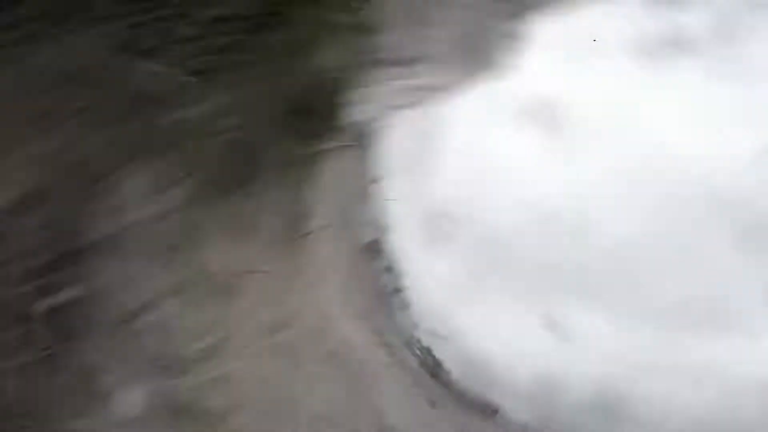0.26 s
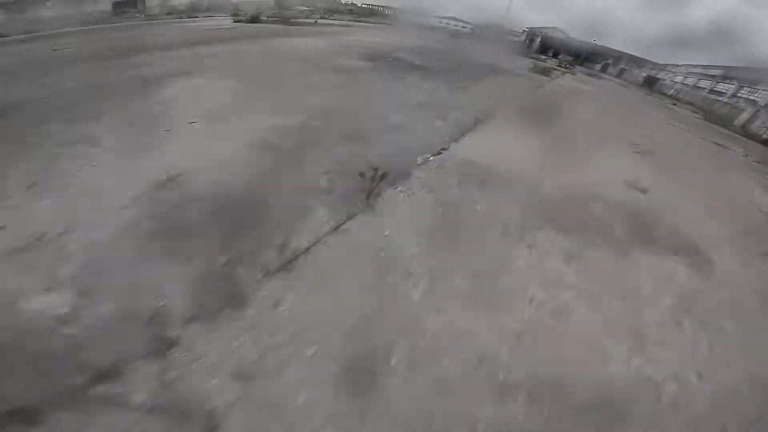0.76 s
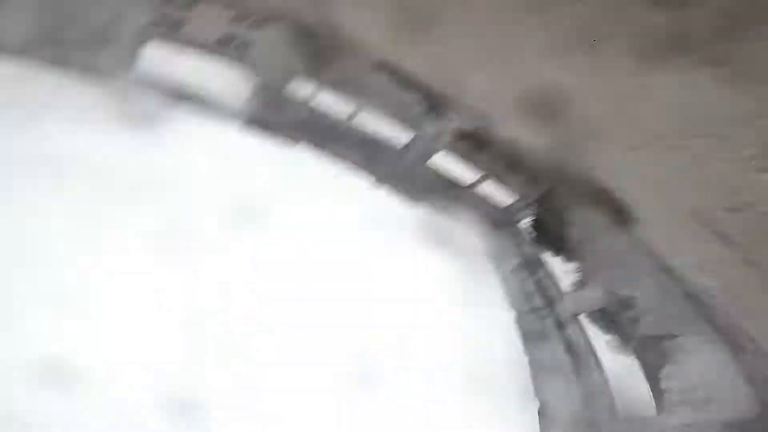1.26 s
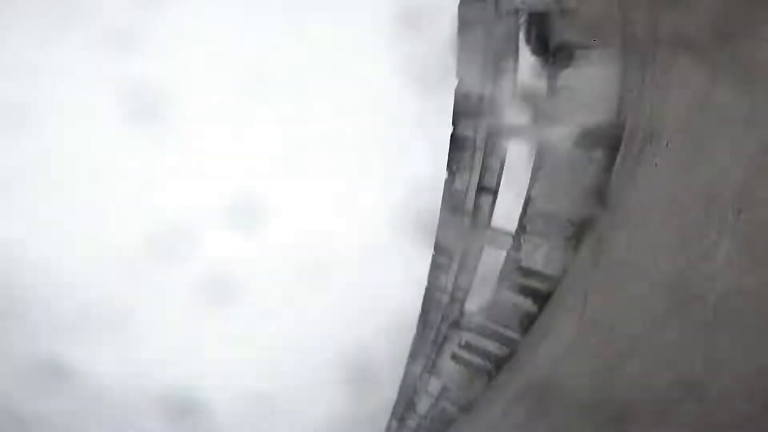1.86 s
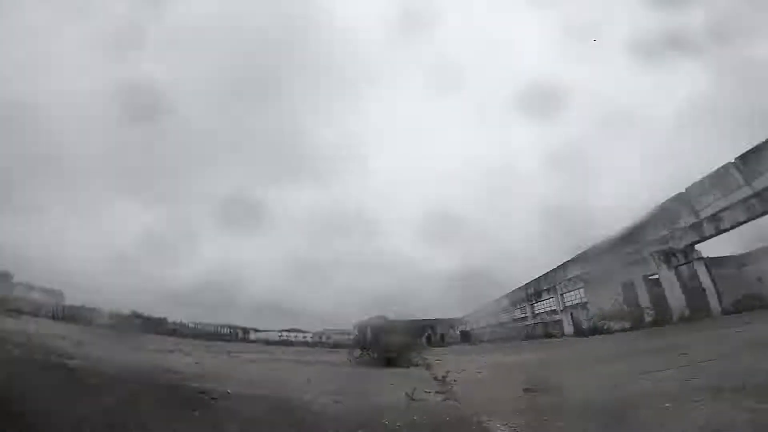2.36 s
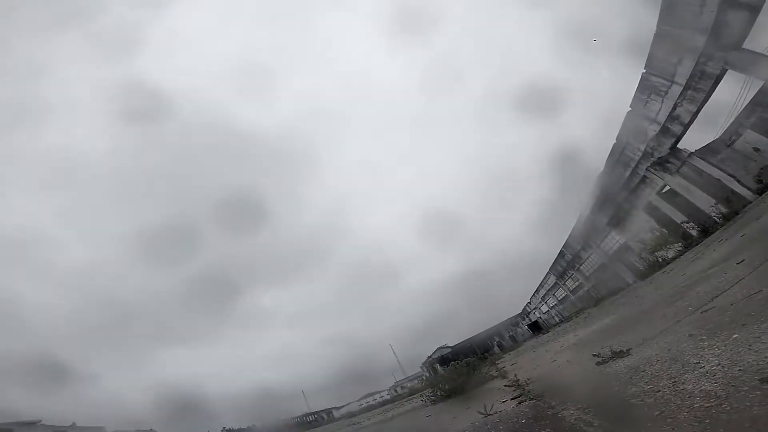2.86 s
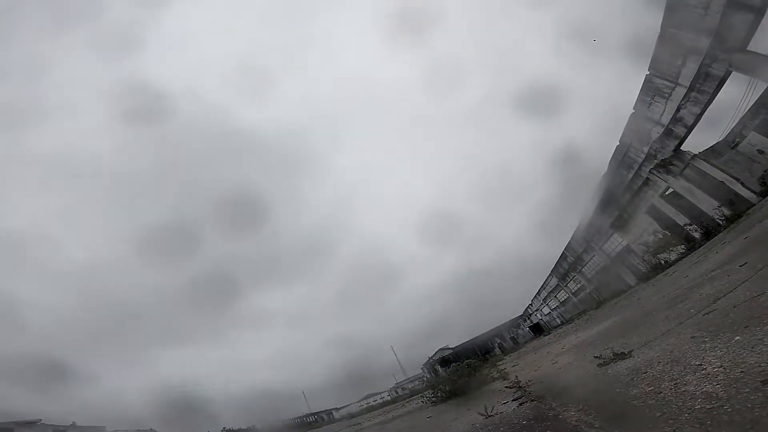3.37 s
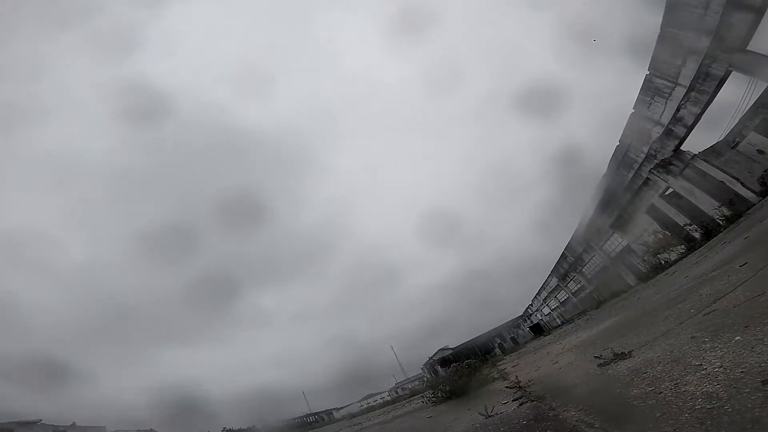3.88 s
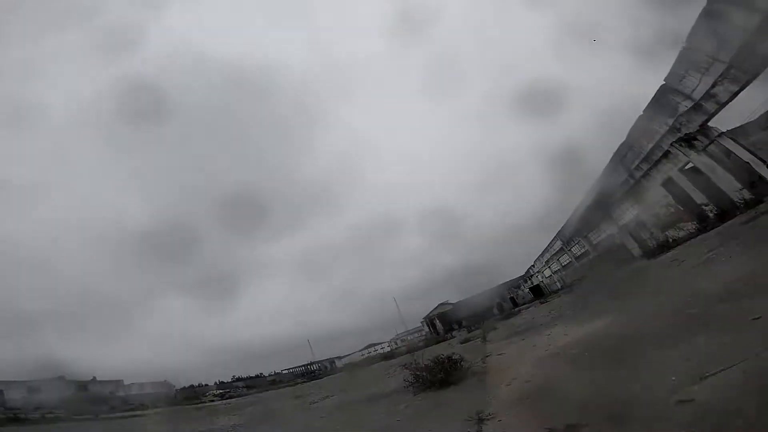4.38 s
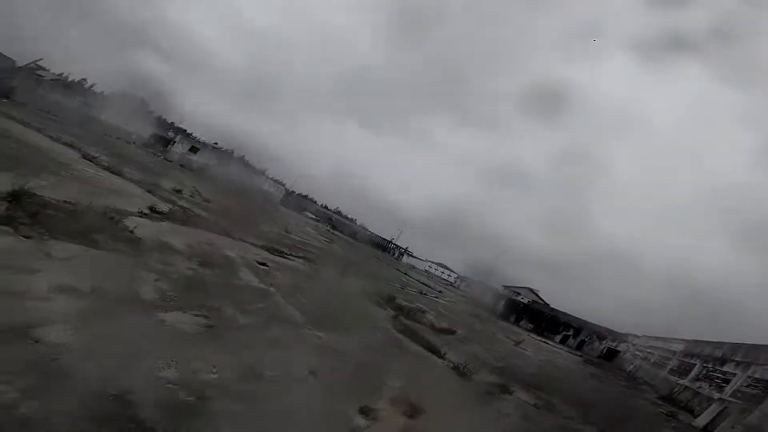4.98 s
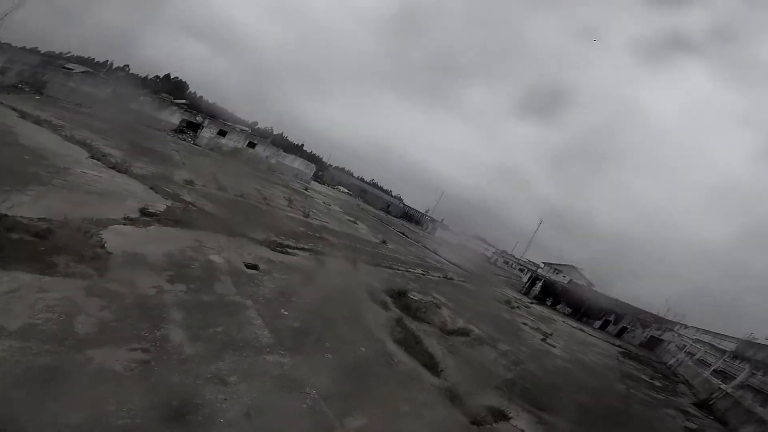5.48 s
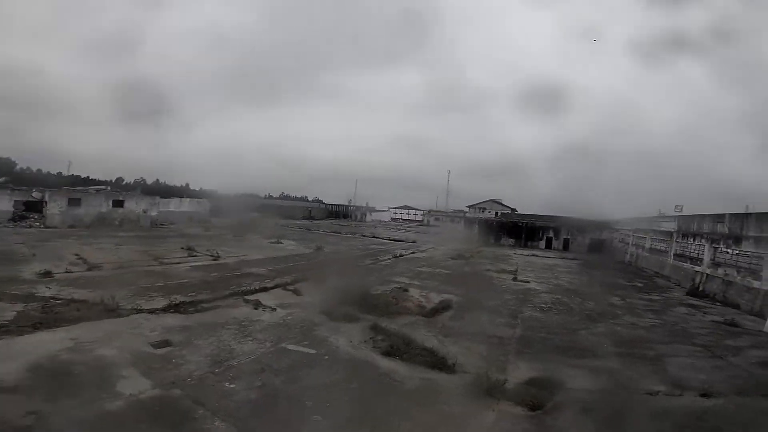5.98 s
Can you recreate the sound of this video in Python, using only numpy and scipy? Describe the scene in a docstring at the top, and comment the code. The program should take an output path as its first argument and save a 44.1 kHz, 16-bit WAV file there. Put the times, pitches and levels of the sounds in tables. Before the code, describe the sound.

A microphone on a small quadcopter's frame, in an open concrete yard. Rotors whine and surge unevenly amid hard knocks, then run down and stop. The frame tumbles on with clacks, thuds and gritty scrapes, settling into near silence. The motors restart with a low, rough buzz and ground chatter, rise sharply into a whine, lift off, then dip and surge again.

```python
"""A concrete yard, heard from a microphone on the frame of a small racing quadcopter that clips the ground.
Blade tones, shaft hum and torn air surge as it tumbles; drag slows the rotors and the ground stops them.
The frame knocks and scrapes to rest: bursts of grit noise for the contacts, dying sines for the thuds.
Four three-blade rotors restart at unequal speeds, churn the air against the ground, and lift it off."""
import sys
import numpy as np
from scipy import signal
from scipy.io import wavfile
from scipy.ndimage import uniform_filter1d

SR = 44100
rng = np.random.default_rng(int(sys.argv[2]) if len(sys.argv) > 2 else 0)


def master_out(mix):
    """Clip the mix to full scale and print it as 16-bit PCM to the path in sys.argv[1]."""
    frames = np.transpose(np.atleast_2d(mix))
    ceiling = np.clip(frames, -1, 1)
    pcm = np.round(ceiling * 32767).astype(np.int16)
    wavfile.write(sys.argv[1], SR, pcm)


N = 274953
T = np.arange(N) / SR

# Two rotors in the tumble. Each row: time in seconds, shaft speed in Hz before the coast-down.
FIRST_ROTOR = [(0, 286.3), (.05, 213.4), (.1, 195.3), (.2, 229.4), (.365, 230.3), (.4, 294.4),
               (.435, 302.7), (.49, 230.4), (.54, 344)]
SECOND_ROTOR = [(0, 271), (.03, 221), (.078, 325), (.16, 232.6), (.2, 288.4), (.31, 311.2), (.385, 256.1),
                (.43, 299.6), (.462, 375.6), (.505, 396.9), (.545, 335.9)]
# Shafts at take-off. Each row: time in seconds, speed in Hz of the fastest, unbalanced rotor,
# speed in Hz of the middle one of the other three.
LIFT_SPEEDS = [(3.35, 98, 77), (3.8, 119, 92), (4, 127, 107), (4.15, 207, 205), (4.3, 253, 231),
               (4.4, 268, 235), (4.53, 275, 244), (4.66, 302, 268), (4.71, 294, 260), (4.86, 196, 165),
               (4.94, 199, 170), (5.02, 160, 128), (5.08, 160, 123), (5.18, 190, 161), (5.31, 211, 172),
               (5.5, 120, 91), (5.66, 124, 104), (5.84, 99, 82), (5.97, 103, 92), (6.04, 165, 150),
               (6.1, 225, 215), (6.16, 254, 240), (6.23, 250, 236)]
# Turbulence that the blades meet, highest near the ground and in their own wake.
# Each row: time in seconds, relative level in dB.
WAKE_LEVEL = [(3.35, 7.5), (3.8, 7.5), (4.06, 14), (4.25, 7.5), (4.42, .5), (4.64, -3), (4.76, 0.5),
              (5.05, 2.5), (5.25, 5.5), (5.5, 4.5), (5.66, 8), (5.88, 9.5), (6.02, 14.5), (6.13, 9),
              (6.23, 4.5)]
# Blows on the frame. Each row: start in seconds, then relative levels in dB of clack, tick and thud,
# decay time of the contact in seconds.
BLOWS = [(.13, -2, -17, -17, 0.0059), (.148, -9, -25, -9, 0.0036), (.203, -4.5, -19.5, -17, 0.0054),
         (.25, -21, -18, -27, 0.0019), (.282, 0, -15.5, -10.5, 0.0044), (.353, -16, -17, -9.5, 0.0061),
         (0.375, -9.5, -35, -10.5, 0.0061), (.93, -18, -36, -12, 0.0092), (.942, -10.5, -27, -8.5, 0.012),
         (0.951, -21, -33, -16, 0.0044), (.991, -48, -28, -38, 0.0063), (1.016, -49, -40, -43, .012),
         (1.041, -54, -25.5, -41, 0.0067), (1.081, -51, -43, -43, 0.018), (1.117, -9, -15, -16, 0.0066),
         (1.128, -11, -20, -7, 0.0068), (1.167, -24, -39, -34, 0.013), (1.307, -41, -65, -18, 0.0036),
         (1.412, -15.5, -28, -10.5, 0.0063), (1.425, -20, -32, -9, 0.0076), (1.498, -3, -16.5, -10, 0.0066),
         (1.696, -28, -18.5, -17, 0.0044), (1.897, -5.5, -22.5, -4.5, 0.0055),
         (1.918, -22, -33, -23, 0.0035), (1.962, -6.5, -23, -3.5, 0.0039), (2.003, -12, -34.5, -9, 0.0083),
         (2.084, -15.5, -43, -12, 0.0037), (2.129, -21, -20, -15, 0.002), (2.175, -20, -40, -12, 0.015),
         (2.209, -24, -29, -15, 0.0038), (2.346, -32.5, -46, -47, 0.006), (2.415, -35, -46, -14, 0.0078),
         (2.477, -25, -49, -11, .007), (2.512, -26, -40, -35, 0.0052), (2.732, -45, -70, -30, 0.0087),
         (3.645, -9.5, -37, -41, 0.0045), (3.951, -33, -25, -9, 0.0045), (4.049, -33, -17, -7.5, 0.0083)]
# Spectrum of a coarse contact. Each row: frequency in Hz, relative level in dB per Hz.
CLACK_COLOUR = [(150, -15.5), (250, -1.5), (347, 1), (679, -17.5), (1260, -19.5), (1570, -17.5),
                (2240, -21.5), (2470, -21), (3390, -22), (4280, -34), (4600, -24), (5980, -28.5),
                (10100, -120)]

# the throttle closes and drag halves the speed in COAST_S; later the blades stop biting the air
THROTTLE_OFF_S, COAST_S = .556, .131
STALL_S, STALL_DB_PER_S, STALL_DEPTH_DB = 0.77, 350, 19
# the rotors' blade sounds dip briefly
DIP_S, DIP_WIDTH_S, DIP_DB = 0.253, 0.034, -23
# the ground stops the rotors: full until STOP_S, then a short fade
STOP_S, STOP_FADE_S = .93, 0.038
# the motors restart; the frame takes LEAVE_S to leave the ground and is clear of it at LIFT_OFF_S
RESTART_S, LIFT_OFF_S, LEAVE_S = 3.353, 4.27, 0.17
DOWNWASH_BUILD_S = 0.15
# a motor that is speeding up works harder: octaves per second at full effort
FULL_EFFORT_OCT_PER_S = 13.6
# sounds that grow with shaft speed: (relative dB at CRUISE_HZ, dB per octave)
CRUISE_HZ = 200
TUMBLE_WHINE, TUMBLE_RUSH, TUMBLE_HISS = (-27, 10.4), (-29.5, 3.5), (-37.5, 14.4)
LIFT_WHINE, LIFT_RUSH, LIFT_HISS = (-19, 8.6), (-29, 3.28), (-30.5, 10.4)
GROUND_SHAKE, GROUND_CHURN, GROUND_CHATTER = (-7.5, 9.9), (-21.5, 0.72), (-23, 6.5)
# every blow leaves the camera wobbling and loose grit pattering
WOBBLE_DB, WOBBLE_RISE_S, WOBBLE_DECAY_S = -1.5, 0.0036, 0.051
PATTER_PER_S, PATTER_DB = 120, -37
# light blows are duller: treble edge of a tick of HARD_DB, and the dB that halve it
HARD_DB, HARD_EDGE_HZ, SOFTEN_DB = -23.5, 13500, 28
EDGE_HZ = 15600


def gain_of(db):
    """Decibels to amplitude."""
    return 10 ** (np.asarray(db) / 20)


def evened(x):
    """Scales to unit rms."""
    return x / np.sqrt(np.mean(x ** 2) + 1e-20)


def curve(rows, column=1):
    """One column of a time table, at every sample."""
    rows = np.asarray(rows)
    return np.interp(T, rows[:, 0], rows[:, column])


def add(mix, s, sound):
    """Mixes a sound in at s seconds."""
    part = mix[max(round(s * SR), 0):][:len(sound)]
    part += sound[:len(part)]


def colour(x, points, size=8192):
    """Causal filter of unit energy with the given spectrum."""
    hz, db = np.transpose(points)
    bins = abs(np.fft.fftfreq(size, 1 / SR))
    bin_db = np.interp(np.log(bins + 1), np.log(hz), db)
    log_gain = np.log(gain_of(bin_db) + 1e-5)
    # minimum phase: the phase follows from the log gain
    spectrum = np.exp(np.conj(signal.hilbert(log_gain)))
    taps = np.fft.ifft(spectrum).real[:size // 2]
    return signal.oaconvolve(x, taps / np.linalg.norm(taps))[:N]


def noise(points):
    """White noise through a unit-energy filter of the given spectrum."""
    return colour(rng.standard_normal(N), points)


def wander(rate_hz):
    """Slow random drift of unit rms."""
    knots = np.arange(0, T[-1] + 1, .5 / rate_hz)
    return evened(np.interp(T, knots, rng.standard_normal(len(knots))))


def grit(per_s, spread_db):
    """Random clicks of unequal size, unit rms."""
    struck = rng.random(N) < per_s / SR
    size_db = spread_db * np.minimum(rng.exponential(1, N), 4)
    return evened(rng.standard_normal(N) * struck * gain_of(size_db))


def ring(modes, shifts=0):
    """Dying sines of a struck body; shifts moves each by a share of its frequency."""
    t = np.arange(SR // 4) / SR
    hz, db, t60 = np.transpose(modes)[:, :, None]
    decay = np.exp(-np.log(1000) * t / t60)
    return (gain_of(db) * decay * np.sin(2 * np.pi * hz * (1 + shifts) * t)).sum(0)


def by_speed(law, speed_hz):
    """Gain of a sound that grows by so many dB per octave of shaft speed."""
    cruise_db, octave_db = law
    return gain_of(cruise_db + octave_db * np.log2(speed_hz / CRUISE_HZ))


def effort(speed_hz):
    """0 at a steady or falling speed, 1 while the motor accelerates hard; it lingers a little."""
    oct_per_s = np.gradient(np.log2(speed_hz)) * SR
    climb = np.clip(oct_per_s / FULL_EFFORT_OCT_PER_S, 0, 1)
    return signal.lfilter(*signal.butter(1, 6, fs=SR), climb)


def tumble_speed(points):
    """A rotor follows its controller, then coasts down against air drag."""
    return curve(points) / (1 + np.maximum(T - THROTTLE_OFF_S, 0) / COAST_S)


def spinning():
    """1 until the ground stops the rotors, then 0."""
    return np.clip((STOP_S - T) / STOP_FADE_S + 1, 0, 1)


def tumble_gain():
    """The blades sound fully until they stall, with one brief dip, then faintly until the rotors stop."""
    stall_db = np.minimum(STALL_DB_PER_S * np.maximum(T - STALL_S, 0), STALL_DEPTH_DB)
    dip_db = DIP_DB * np.exp(-((T - DIP_S) / DIP_WIDTH_S) ** 2)
    return spinning() * gain_of(dip_db - stall_db)


def running(rise_s=0.014):
    """0 until the motors restart, then 1."""
    return np.clip((T - RESTART_S) / rise_s + 1, 0, 1)


def airborne():
    """0 before lift-off, 1 once clear of the ground."""
    return np.clip((T - LIFT_OFF_S) / LEAVE_S + 1, 0, 1)


def shaft_hum(speed_hz):
    """Gain of the once-a-turn shaking, as the camera mount answers this speed."""
    # Each row: shaft speed in Hz, relative level in dB.
    mount = [(80, -20), (98, -17.5), (122, -20), (142, -13.5), (161, -27), (184, -11.5), (210, -12.5),
             (232, -14.5), (268, -12.5), (300, -11), (345, -7.5), (400, -12.5)]
    return gain_of(np.interp(speed_hz, *np.transpose(mount)))


def rotor(speed_hz, darker_db, uneven_db, jitter=.0035, flutter_db=2, idle_db=.8):
    """One rotor: its blade tones, its once-a-turn shaking, and the pulsing of its three blades."""
    # Blade tones. Each row: multiple of the shaft speed, relative level in dB.
    blade_orders = [(2, -8), (3, 0), (4, -13), (5, -20), (6, -5), (7, -20), (8, -17), (9, -4), (10, -20),
                    (12, -9), (15, -17), (18, -21), (21, -20), (24, -21)]
    # How the frame carries them. Each row: frequency in Hz, relative level in dB.
    carry = [(150, 5.5), (400, 2), (750, -3.5), (1180, 2), (1600, -3), (2200, -2.5), (2900, -2), (4500, -1),
             (8000, -30)]
    unsteady_hz = speed_hz * (1 + jitter * wander(rate_hz=45))
    angle = 2 * np.pi * np.cumsum(unsteady_hz) / SR
    # slow blades are lightly loaded and sound duller
    slope_db = darker_db + idle_db * np.interp(speed_hz, [150, 240], [1, 0])
    blades = np.zeros(N)
    for order, db in blade_orders:
        octaves = abs(np.log2(order / 3))  # away from the blade-passing tone
        carried_db = np.interp(order * speed_hz, *np.transpose(carry))
        # only unlike blades sound between the multiples of three
        tone_db = db - slope_db * octaves + carried_db + uneven_db * (order % 3 > 0)
        level = gain_of(tone_db + flutter_db * wander(rate_hz=25))
        blades += level * np.cos(order * angle + 2 * np.pi * rng.random())
    shaft = np.sqrt(2) * np.sin(angle)
    chop = np.cos(3 * angle)
    return blades, shaft, chop


def tumbling_rotors(hum_db=-12, first_db=-1, second_db=-1.5, effort_db=6):
    """Two rotors pull against each other, then run down; their shafts hum on after the blades stall."""
    whine, hum = np.zeros((2, N))
    for points, blade_db in [(FIRST_ROTOR, first_db), (SECOND_ROTOR, second_db)]:
        speed_hz = tumble_speed(points)
        blades, shaft, _ = rotor(speed_hz, darker_db=3.0, uneven_db=-2.5)
        strain = gain_of(blade_db + effort_db * effort(speed_hz))
        whine += strain * by_speed(TUMBLE_WHINE, speed_hz) * blades
        hum += gain_of(hum_db) * shaft_hum(speed_hz) * shaft
    return tumble_gain() * whine + spinning() * hum


def blade_air(pulsing, rush_db=-1, hiss_db=1.0, chop_db=2, flap_db=1.5, hiss_share=0.83):
    """Turbulence torn off the blades: it swells with the take-off blade pulsing and flaps near the ground."""
    # Low and high parts of the torn air. Each row: frequency in Hz, relative level in dB per Hz.
    rush_colour = [(100, 1), (300, -0.5), (600, 3), (900, -9), (1250, 5), (1700, 3), (2200, 2), (2800, -3),
                   (3500, -5), (4200, -21), (5500, -9), (9000, -81)]
    hiss_colour = [(2470, -26.5), (4200, -9), (4460, -8), (5230, 3), (6760, 0.5), (8240, -9), (10700, -24),
                   (11500, -29.5), (12700, -32.5), (14600, -42), (15500, -55)]
    # Turbulence in the tumble. Each row: time in seconds, relative level in dB.
    tumble_wake = [(0, -1), (.04, 3), (.08, 7.5), (.2, 7), (.31, -1.5), (.42, 2), (.5, -3), (.58, -3.5),
                   (.68, -1.5), (.76, 0.5)]
    tumble_hz = (tumble_speed(FIRST_ROTOR) + tumble_speed(SECOND_ROTOR)) / 2
    lift_hz = curve(LIFT_SPEEDS, 2)
    tumbling = tumble_gain() * gain_of(curve(tumble_wake))
    lifting, wake_db = running(), curve(WAKE_LEVEL)
    rush = tumbling * by_speed(TUMBLE_RUSH, tumble_hz)
    rush += lifting * by_speed(LIFT_RUSH, lift_hz) * gain_of(wake_db)
    hiss = tumbling * by_speed(TUMBLE_HISS, tumble_hz)
    hiss += lifting * by_speed(LIFT_HISS, lift_hz) * gain_of(hiss_share * wake_db)
    flap = flap_db * (1 - 1.07 * airborne()) * wander(rate_hz=120)
    swell = evened(gain_of(chop_db * pulsing + flap))
    air = gain_of(rush_db) * rush * noise(rush_colour) + gain_of(hiss_db) * hiss * noise(hiss_colour)
    return swell * air


def background_hush():
    """Background hush: filtered noise that sinks, then swells before the restart."""
    # Each row: frequency in Hz, relative level in dB per Hz.
    hush_colour = [(90, -17), (150, -0.5), (215, -1), (505, -8.5), (640, -9), (1050, -9), (1460, -15.5),
                   (3300, -35), (4200, -48), (7000, -34.5), (10000, -41), (14000, -70.5)]
    # Each row: time in seconds, level in dB.
    hush_level = [(0, -45.5), (2.2, -57.5), (2.7, -48.5), (3.3, -42.5), (6.23, -43)]
    return gain_of(curve(hush_level)) * noise(hush_colour)


def downwash():
    """0 to 1 as air builds up under the rotors, back to 0 as the frame leaves the ground."""
    return np.clip((T - RESTART_S) / DOWNWASH_BUILD_S, 0, 1) * (1 - airborne())


def wobble():
    """How hard the frame still shakes: each thud adds to its power and dies away."""
    t = np.arange(SR // 2) / SR
    shape = np.exp(-t / WOBBLE_DECAY_S) * (1 - np.exp(-t / WOBBLE_RISE_S)) ** 2
    power = np.zeros(N)
    for s, _, _, thud_db, _ in BLOWS:
        add(power, s, (gain_of(thud_db) * shape) ** 2)
    return np.sqrt(power)


def buffeting(shake_db=-3):
    """Wind, blows and downwash shake the camera: low noise that follows all three."""
    # Spectrum of the shaking. Each row: frequency in Hz, relative level in dB per Hz.
    shake_colour = [(11, -36), (18, 18), (37, 3), (97, 2), (172, -2.5), (284, -15.5), (364, -22.5),
                    (434, -22.5), (496, -36.5), (600, -35.5), (780, -47), (1320, -120)]
    # Wind while the frame flies, rolls and settles. Each row: time in seconds, relative level in dB.
    buffet_level = [(0, -18), (.44, -13.5), (.52, -21), (.9, -28.5), (1.2, -24.5), (1.8, -30.5),
                    (2.2, -23.5), (2.5, -24), (2.85, -40), (3.3, -35)]
    strength = (1 - airborne()) * gain_of(curve(buffet_level))
    strength += gain_of(WOBBLE_DB) * wobble()
    strength += downwash() * by_speed(GROUND_SHAKE, curve(LIFT_SPEEDS, 2))
    shake = gain_of(shake_db) * strength * noise(shake_colour)
    # the microphone passes no infrasound
    return signal.sosfilt(signal.butter(4, 24, "highpass", fs=SR, output="sos"), shake)


def through_frame(coarse, fine, ring_db=-2, direct_db=-4):
    """Coarse contacts clack; fine ones tick and set the arms ringing."""
    # Spectrum of a fine contact. Each row: frequency in Hz, relative level in dB per Hz.
    tick_colour = [(2470, -17), (4200, -15), (4660, -10), (5000, 1.5), (5490, 4), (6440, 0.5), (6870, 5),
                   (8600, -9), (9440, -22.5), (10300, -29.5), (12800, -42.5), (14700, -30.5), (15500, -32)]
    # Stiff arms and blades. Each row: frequency in Hz, relative level in dB, time to fall 60 dB in seconds.
    arm_modes = [(930, -8, .02), (1290, -7, .02), (2080, -9, .02), (5400, -1, .007), (5850, 0, .009),
                 (7700, -4, .006), (8450, -1, .008)]
    arms = ring(arm_modes)
    ringing = signal.oaconvolve(fine, arms / np.linalg.norm(arms))[:N]
    direct = gain_of(direct_db) * colour(fine, tick_colour)
    return colour(coarse, CLACK_COLOUR) + direct + gain_of(ring_db) * ringing


def scrapes(catch_db=3.5):
    """Grains of grit catch in clumps on the sliding frame."""
    # Each row: start in seconds, length in seconds, relative levels in dB of grinding and of fizz.
    slides = [(0.127, 0.24, -34, -43), (.955, .045, -36, -40), (1.119, 0.074, -27, -37),
              (1.179, 0.07, -29.5, -32.5), (1.417, 0.14, -35, -38.5), (1.494, .025, -11.5, -21),
              (1.534, 0.059, -34.5, -45), (1.618, 0.044, -26.5, -30), (1.637, 0.076, -22.5, -27),
              (1.866, 0.17, -32.5, -49), (2.047, .14, -33.5, -58), (2.161, 0.033, -34.5, -37),
              (2.464, .046, -33, -52), (3.355, 0.054, -23, -33)]
    grind, fizz = np.zeros((2, N))
    for s, length, grind_db, fizz_db in slides:
        stroke = signal.windows.tukey(round(length * SR), .6)
        add(grind, s, gain_of(grind_db) * stroke)
        add(fizz, s, gain_of(fizz_db) * stroke)
    clumps = gain_of(catch_db * wander(rate_hz=94))
    grains = evened(grit(per_s=4000, spread_db=3.5) * clumps)
    return through_frame(grind * grains, fizz * grains, ring_db=-3.5, direct_db=-3)


def knocks(clack_db=1, tick_db=3, thud_db=-5, detune=0.12, rise_s=0.0012):
    """Each blow crunches briefly on the concrete and rocks the frame, whose modes shift with the contact."""
    # Frame and camera mount. Each row: frequency in Hz, relative level in dB,
    # time to fall 60 dB in seconds.
    frame_modes = [(58, -11, .14), (91.5, 5.5, 0.14), (141, 3, 0.082), (198.7, -1, 0.11),
                   (248, -3.5, 0.023), (340, -19, .045), (475, -12.5, 0.026)]
    t = np.arange(SR // 4) / SR
    clack, tick, thud = np.zeros((3, N))
    crunch = grit(per_s=7200, spread_db=3.0)
    mode_shifts = rng.uniform(-1.3, 1, (len(BLOWS), len(frame_modes), 1))
    for (s, clack_level, tick_level, thud_level, decay), shifts in zip(BLOWS, mode_shifts):
        envelope = np.exp(-t / max(decay, .001)) * (1 - np.exp(-t / rise_s))
        contact = envelope * crunch[round(s * SR):][:len(t)]
        edge_hz = np.clip(HARD_EDGE_HZ * 2 ** ((tick_level - HARD_DB) / SOFTEN_DB), 8500, 18000)
        dulled = signal.lfilter(*signal.butter(4, edge_hz, fs=SR), contact)
        add(clack, s, gain_of(clack_level + clack_db) * contact)
        add(tick, s, gain_of(tick_level + tick_db) * dulled)
        add(thud, s, gain_of(thud_level + thud_db) * ring(frame_modes, detune * shifts))
    # the thud carries no steady push and no treble above about 1.4 kHz
    thud = signal.sosfilt(signal.butter(2, [45, 1400], "bandpass", fs=SR, output="sos"), thud)
    return through_frame(clack, tick) + thud


def patter(clack_db=6):
    """Loose grit taps the frame while it shakes."""
    taps = gain_of(PATTER_DB) * wobble() * grit(PATTER_PER_S, spread_db=3.5)
    return through_frame(gain_of(clack_db) * taps, taps, ring_db=-6, direct_db=-15)


def lifting_rotors(hum_db=2.0, grounded_db=-12, braking_db=-4, effort_db=5):
    """Four rotors at unequal speeds beat against each other; returns their tone and their joint pulsing."""
    fast, slow = curve(LIFT_SPEEDS, 1), curve(LIFT_SPEEDS, 2)
    whine = by_speed(LIFT_WHINE, slow) * gain_of(effort_db * effort(slow))
    # the frame shakes less on the ground and while the motors slow down
    braking = uniform_filter1d(1. * (np.gradient(fast) < 0), size=3000)
    braking_share = braking * np.interp(fast, [130, 204, 223, 262], [0, 1, 1, 0])
    hum = shaft_hum(fast) * gain_of(grounded_db * (1 - airborne()) + braking_db * braking_share)
    # the four speeds spread and close up together
    spread = fast - slow
    # (speed Hz, blade dB, imbalance dB, darkening dB per octave)
    rotors = [(fast, -6.5, 0, 2.5), (slow, -3, -8, 0),
              (slow + .14 * spread, -7.5, -15, 1), (slow - .3 * spread, -6.5, -13, 2)]
    tone, pulsing = np.zeros((2, N))
    for speed_hz, blade_db, imbalance_db, darker_db in rotors:
        blades, shaft, chop = rotor(speed_hz, darker_db, uneven_db=-2.5)
        tone += gain_of(blade_db) * whine * blades
        tone += gain_of(hum_db + imbalance_db) * hum * shaft
        pulsing += chop
    return running() * tone, evened(pulsing)


def chatter(uneven_db=4):
    """Until lift-off, the unbalanced rotor taps the frame on the ground once a turn."""
    fast = curve(LIFT_SPEEDS, 1)
    turns = np.floor(np.cumsum(fast * (1 + .05 * wander(rate_hz=60))) / SR)
    taps = evened(np.diff(turns, prepend=0) * gain_of(uneven_db * rng.standard_normal(N)))
    grounded = running() * (1 - airborne())
    return colour(grounded * by_speed(GROUND_CHATTER, fast) * taps, CLACK_COLOUR)


def ground_churn():
    """Downwash churns against the ground: dense, low-filtered clicks that grow with shaft speed."""
    # Each row: frequency in Hz, relative level in dB per Hz.
    churn_colour = [(76, -26), (130, -1), (178, -14), (280, -7), (324, -3), (497, 2.5), (735, -12.5),
                    (1000, -12), (1300, -38), (2200, -120)]
    bursts = colour(grit(per_s=3000, spread_db=0.5), churn_colour)
    return downwash() * by_speed(GROUND_CHURN, curve(LIFT_SPEEDS, 2)) * bursts


def flight_wind(level_db=-31.5):
    """Low wind at the microphone once aloft: noise that partly follows the wake."""
    # Each row: frequency in Hz, relative level in dB per Hz.
    flight_colour = [(11, -52), (18, -29), (45, -3), (72, 2.5), (102, -11.5), (130, -4), (170, -22),
                     (290, -120)]
    # level_db holds where the wake stands at 4 dB
    wake_db = .6 * (curve(WAKE_LEVEL) - 4)
    return airborne() * gain_of(level_db + wake_db) * noise(flight_colour)


def scene():
    """Everything reaches one microphone on the frame."""
    tone, pulsing = lifting_rotors()
    rotors = tumbling_rotors() + tone + blade_air(pulsing)
    air = background_hush() + buffeting() + ground_churn() + flight_wind()
    contacts = scrapes() + knocks() + patter() + chatter()
    return (rotors + air + contacts)[None]


def record(dry):
    """The loudest peaks are rounded off; then the band limit."""
    limited = dry / (1 + dry ** 6) ** (1 / 6)
    lowpass = signal.firwin(511, EDGE_HZ, window=("kaiser", 9), fs=SR)
    return signal.oaconvolve(limited, lowpass[None], "same")


dry = scene()
out = record(dry)
master_out(out)
```